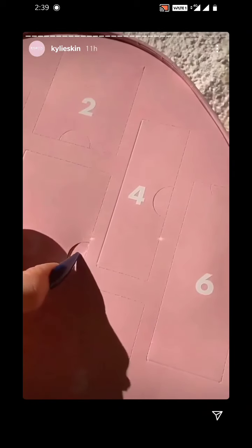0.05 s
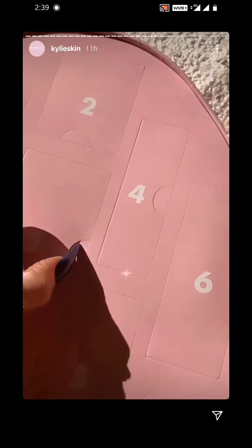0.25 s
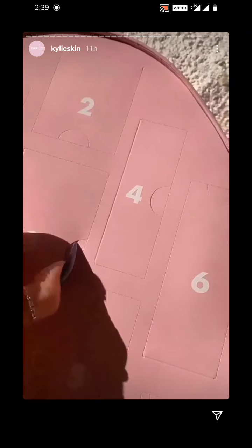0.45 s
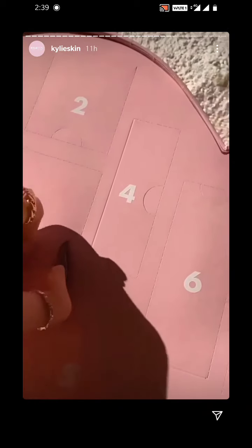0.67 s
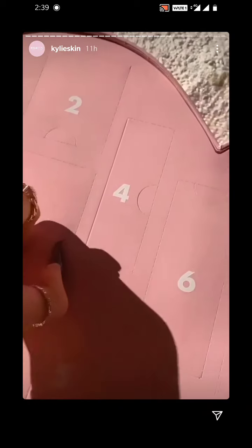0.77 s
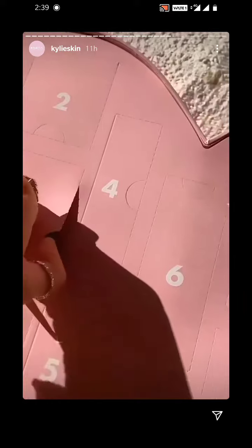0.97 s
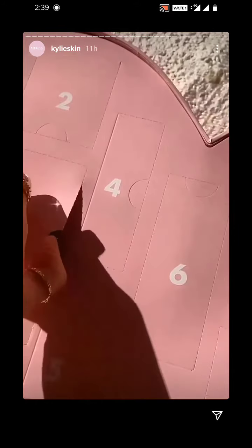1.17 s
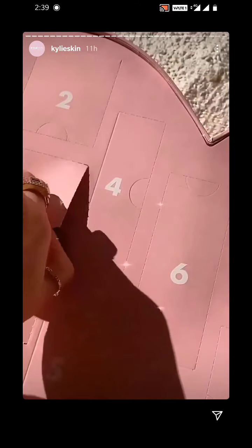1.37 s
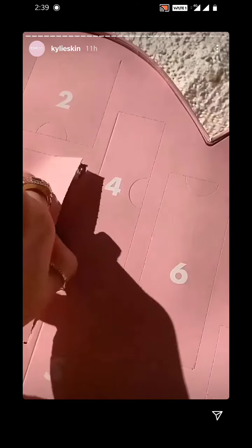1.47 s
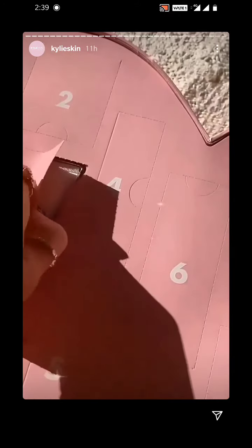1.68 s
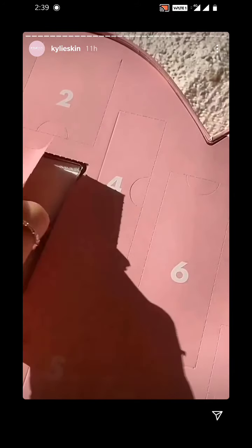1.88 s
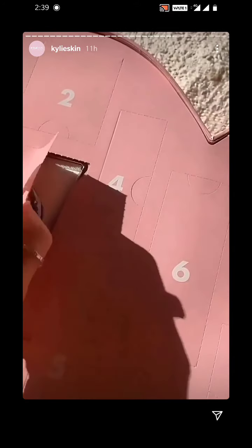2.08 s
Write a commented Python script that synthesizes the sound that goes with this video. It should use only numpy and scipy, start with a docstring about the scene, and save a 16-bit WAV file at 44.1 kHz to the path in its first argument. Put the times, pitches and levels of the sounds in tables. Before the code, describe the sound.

Perforated cardboard flap pried open by a fingernail: a few isolated dry ticks, a tight burst of snaps, then a dense crackling tear, a short fold creak and papery rubbing, close phone microphone in a quiet room.

```python
"""Paper bridges snap one by one, dry cracks with a card-like knock, as a fingernail pries open a perforated
cardboard door close to a phone; the flap rubs in its frame, its fold creaks, a quiet room hums and answers.
Snap: a fibre-noise burst rings the card; flap and hollow box ring as a bending wave, treble first, bass last.
Creak: trains of tiny snaps. Rub: grainy coloured noise. Room: noise tails on the snaps, air noise, mains hum.
"""
import sys
import numpy as np
from scipy import signal
from scipy.fft import rfft, irfft, next_fast_len
from scipy.io import wavfile
from scipy.ndimage import uniform_filter1d, map_coordinates

SR = 44100
rng = np.random.default_rng(int(sys.argv[2]) if len(sys.argv) > 2 else 0)


def wrap_up_sound(samples):
    """Save the sound to the file named by the first command line argument, as 16-bit audio."""
    columns = np.atleast_2d(samples).T
    # keep every value between -1 and 1, then stretch to whole-number steps
    tamed = np.clip(columns, -1, 1)
    steps = np.round(tamed * 32767).astype(np.int16)
    wavfile.write(sys.argv[1], SR, steps)


def elevation(decibels):
    """Turn decibel levels (scalar or array-like) into linear amplitude ratios."""
    levels = np.asarray(decibels, float)
    return 10 ** (levels / 20)


N = 94109


def along(points, hz):
    """Interpolate (f/Hz, value) points on a log frequency axis."""
    f, v = np.transpose(points)
    return np.interp(np.log(hz + 1), np.log(f + 1), v)


def unit(x):
    """Scale to rms 1."""
    return x / np.sqrt(np.mean(x ** 2) + 1e-20)


def wobble(knots_per_s):
    """Smooth random curve: a spline through normal knots."""
    knots = rng.standard_normal(N // 8)
    return map_coordinates(knots, [np.arange(N) * min(knots_per_s / SR, 0.1)])


def filtered(x, response):
    """Multiply the spectrum of x by a response of frequency in Hz."""
    m = next_fast_len(N + 8192)
    return irfft(rfft(x, m) * response(np.fft.rfftfreq(m, 1 / SR)), m)[:N]


def modes(f, table):
    """Causal sum of resonances (f/Hz, width/Hz, level/dB), alternating in sign."""
    total = 0
    for k, (centre, width, db) in enumerate(table):
        resonance = 1j * f * width / (centre * centre - f * f + 1j * f * width)
        total = total + (-1) ** k * elevation(db) * resonance
    return total


def peak(spectrum, db):
    """Waveform of a spectrum; a sine with the power of its loudest millisecond would peak at db."""
    x = irfft(spectrum)
    loudest_power = uniform_filter1d(x * x, size=SR // 1000).max()
    return elevation(db) * x / np.sqrt(2 * loudest_power)


def background():
    """Room air as coloured noise, mains hum as sines wavering in level and phase."""
    # air noise spectrum, relative: f/Hz, density/dB per Hz
    air_colour = [(15, -72), (25, -35), (44, -6), (123, -6.5), (157, -15), (335, -18.5), (363, -18.5),
                  (427, -25), (818, -31), (1190, -33.5), (1370, -26.5), (2110, -41.5), (16000, -61)]
    # mains hum partials: f/Hz, mean level/dB rms
    hum_partials = [(59.5, -78.5), (119.5, -65), (240, -80), (359, -88.5)]
    air_db_rms, hum_waver_db = -65, 0.5
    t = np.arange(N) / SR
    air = unit(filtered(rng.standard_normal(N), lambda hz: elevation(along(air_colour, hz))))
    hum = np.zeros(N)
    for hz, db in hum_partials:
        level = elevation(db + 3 + hum_waver_db * wobble(14))  # +3 dB: rms to sine peak
        hum += level * np.sin(2 * np.pi * hz * t + 0.45 * wobble(9))
    return elevation(air_db_rms) * air + hum


def room(x):
    """Diffuse reverberation: noise tails, each frequency dying at its own speed, a fresh tail every 0.1 s."""
    # reverberation time: f/Hz, t60/s
    decay_times = [(150, 0.38), (1200, 0.34), (5000, 0.37), (14000, 0.22)]
    out, step = np.zeros(N + SR), SR // 10
    for a in range(0, N, step):
        hz, t, z = signal.stft(rng.standard_normal(SR // 2), SR, nperseg=256)
        t60_s = np.maximum(along(decay_times, hz), 0.02)[:, None]
        tail = signal.istft(z * elevation(-60 * t / t60_s), SR, nperseg=256)[1]
        wet = signal.fftconvolve(x[a:a + step], tail / np.linalg.norm(tail))
        out[a + 150:][:len(wet)] += wet  # 150 samples of pre-delay
    return out[:N]


def rub():
    """Flap and fingers slide on the card: noise with a random grain, coloured, following a level curve."""
    # rubbing level: t/s, level/dB
    rub_level = [(0, -86), (.3, -84), (.4, -79.5), (.58, -79), (.66, -82), (.78, -72), (0.919, -77.5),
                 (1.0, -72), (1.07, -78.5), (1.17, -74), (1.25, -66), (1.33, -68), (1.46, -66.5),
                 (1.56, -71), (1.59, -65), (1.63, -65.5), (1.66, -74.5), (1.70, -66), (1.74, -79),
                 (1.87, -77.5), (1.946, -64), (1.986, -60.5), (2.008, -68), (2.042, -61), (2.081, -75),
                 (2.13, -70.5)]
    # rubbing spectrum, relative: f/Hz, density/dB per Hz
    rub_colour = [(180, -59), (300, 4.5), (701, -7.5), (856, -1), (1750, -13), (2170, -9), (2840, -12.5),
                  (3830, -13.5), (8090, -16.5), (16000, -36)]
    grain = elevation(3.5 * wobble(900) + 0.8 * wobble(60))  # fine and slow grain, dB
    noise = grain * rng.standard_normal(N)
    hiss = unit(filtered(noise, lambda hz: elevation(along(rub_colour, hz))))
    s, db = np.transpose(rub_level)
    return hiss * elevation(np.interp(np.arange(N) / SR, s, db))


def slips():
    """Stick-slip in the fold: rows of tiny snaps at an uneven rate, fading."""
    # creaks of the fold: start t/s, end t/s, mean rate/(slips per s), initial flap level/dB (before scatter)
    creaks = [(1.585, 1.654, 95, -54), (2.025, 2.055, 140, -58.5)]
    flap_hz, crack_re_flap_db, fade_db = 1200, -4.5, 5  # fade over one creak
    rows = []
    for start, end, rate, db in creaks:
        chance = rng.standard_normal((12, 3))
        for k, (late, tune, size) in enumerate(chance):
            s = start + (k + 0.12 * late * (k > 0)) / rate
            if s >= end:
                continue
            level_db = db - fade_db * (s - start) / (end - start) + 2 * size
            rows.append((s, flap_hz * (1 + 0.07 * tune), level_db, level_db + crack_re_flap_db, -90, 2))
    return rows


def tearing(ms, tear_ms):
    """Envelope of breaking fibres: creak and build-up before the break at 0 ms, decay and fraying after."""
    creak_ms, creak_db = 2.2, -18  # fibres giving way before the snap
    fray_ms, fray_db = 7, -19  # loose fibres crackling on
    rise_ms = max(0.31 * tear_ms, 0.05)
    away = np.abs(ms)
    before = elevation(creak_db) * np.exp(-away / creak_ms) + np.exp(-away / rise_ms)
    after = np.exp(-away / max(tear_ms, 0.1)) + elevation(fray_db) * np.exp(-away / fray_ms)
    return np.where(ms < 0, before, after)


def snaps():
    """Fibre bursts ring the card; flap and box ring through dispersive bending waves, treble first."""
    # paper bridges and nail ticks: t/s, flap f/Hz, flap peak level/dB, crack peak level/dB,
    # box boom peak level/dB, tearing decay/ms
    bridges = [(0.0475, 1403, -37, -52.5, -58.5, 0.94), (0.3365, 1770, -56, -60.5, -72, 0.6),
               (0.3543, 1180, -63, -71, -63.5, 1.6), (0.5072, 1065, -40.5, -47.5, -43.5, 2.2),
               (0.6934, 1996, -28, -28, -45.5, 0.44), (0.702, 1780, -48, -41.5, -51, 14.4),
               (0.7056, 1115, -27.5, -35.5, -51, 2.1), (0.7261, 2370, -33.5, -30, -46.5, 1.6),
               (0.8025, 1290, -49.5, -44, -53.5, 2), (1.0127, 1160, -63, -61, -60, 1.2),
               (1.101, 1166, -44, -53.5, -56, 5.1), (1.1759, 1180, -58, -63.5, -63.5, 2.2),
               (1.1857, 1130, -62, -59, -67, 1.9), (1.21, 1240, -60, -56.5, -76, 3.5),
               (1.2204, 1140, -49.5, -59, -74, 3.1), (1.229, 1200, -43.5, -45.5, -79, 4.2),
               (1.2676, 2500, -43, -33.5, -71, 0.3), (1.2772, 1100, -37.5, -28, -51.5, 1.55),
               (1.2917, 2440, -64, -62, -43, 0.35), (1.292, 2390, -31, -25.5, -79, 2.4),
               (1.2984, 1530, -24.5, -28.5, -45.5, 5.3), (1.3083, 1540, -49, -35, -53, 1.5),
               (1.3836, 1285, -44, -38, -43, 1.8), (1.3877, 1100, -26.5, -26, -45.5, 3.4),
               (1.4039, 1360, -20, -25, -47, 0.68), (1.42, 744, -30, -37.5, -43.5, 1.6),
               (1.4391, 2046, -24.5, -27.5, -32, 3.4), (1.6715, 988, -26.5, -39.5, -42, 3.7),
               (1.71, 1040, -59, -50, -73, 4.8), (1.821, 1050, -54.5, -61.5, -61.5, 1.4),
               (1.8444, 1350, -66, -62.5, -81, 1.2), (1.9125, 867, -46.5, -65, -58.5, 1.4),
               (1.968, 2070, -44, -44.5, -46, 4.9), (2.017, 2290, -56, -51, -60, 7)]
    # card resonances, f and level scattered per snap: f/Hz, width/Hz (at least 600 used), relative level/dB
    card_modes = [(2043, 440, -1), (3470, 1090, -0.5), (4385, 1090, 0.5), (6660, 470, -6.5),
                  (7910, 685, -4.5), (14600, 20000, -32.5)]
    # panel round the flap, f and level scattered per snap: f/Hz, width/Hz, level/dB
    panel_modes = [(907, 220, -5), (1240, 233, -1)]
    # hollow box resonances, each squared below: f/Hz, width/Hz, level/dB before squaring
    box_modes = [(168, 62, 7.5), (348, 171.6, 5), (780, 120, -10)]
    # dip in the crack's spectrum, made by subtracting a resonance: f/Hz, width/Hz, level/dB
    crack_dip = (2850, 700, -2)
    flap_spread_ms, box_spread_ms = 2.061, 3.417  # travel time at 1 kHz, as 1 / sqrt(f); box is farther
    head_start_ms = 1.332  # taken off the wave delay of flap and boom, offsets the delay of their resonances
    edge_ms, edge_db = 5.02, -15.5  # flap wave returning from the edge of the card
    flap_damping = 0.31  # ring width / pitch
    panel_reach_hz = 1400  # the flap drives panel modes near its own pitch
    kick = 0.5  # single break re all the fibre noise, amplitude ratio

    size, lead = 8192, 1024
    out = np.zeros(N + size)
    ms = (np.arange(size) - lead) / SR * 1000
    f = np.fft.rfftfreq(size, 1 / SR)

    def travel(spread_ms):
        """Bending-wave phase: group delay spread_ms / sqrt(kHz), less the head start."""
        dispersion = -4j * np.pi * spread_ms * np.sqrt(f / 1000)
        return np.exp(dispersion + 2j * np.pi * f * (head_start_ms / 1000 - lead / SR))

    dip = 1 - modes(f, [crack_dip])
    edge = 1 + elevation(edge_db) * np.exp(-2j * np.pi * f * edge_ms / 1000)
    box = sum(modes(f, [wall]) ** 2 for wall in box_modes)
    boom = box * travel(box_spread_ms) / (1 + (f / 800) ** 4)

    for s, hz, flap_db, crack_db, boom_db, tear_ms in bridges + slips():
        burst = tearing(ms, tear_ms)
        break_pulse = kick * np.sqrt(np.sum(burst ** 2)) * (ms == 0)
        fibres = rng.standard_normal(size) * burst + break_pulse
        card = [(c * (1 + 0.04 * rng.normal()), max(w, 600), db + 1.5 * rng.normal())
                for c, w, db in card_modes]
        crack = rfft(fibres) * modes(f, card) * dip

        panel = [(c * (1 + 0.03 * rng.normal()), w, db + rng.normal(0, 2)) for c, w, db in panel_modes]
        flap_ring = modes(f, [(hz, flap_damping * hz, 0)]) ** 2
        panel_ring = modes(f, panel) * modes(f, [(hz, panel_reach_hz, 0)])
        flap = (flap_ring + panel_ring) * edge * travel(flap_spread_ms)

        snap = peak(crack, crack_db) + peak(flap, flap_db) + peak(boom, boom_db)
        out[round(s * SR) - lead:][:size] += snap
    return out[:N]


def scene():
    """Snaps and creaks, the room's answer to them, rubbing, background."""
    card = snaps()
    room_db = -18.5
    return (card + elevation(room_db) * room(card) + rub() + background())[None]


def top_cut(x):
    """Nothing passes above the cut-off."""
    return signal.sosfilt(signal.butter(12, 16480, fs=SR, output="sos"), x)


def record(dry):
    """The phone's band limit: steep zero-phase low-pass, -3 dB at top_hz."""
    top_hz = 15600
    limited = filtered(dry[0], lambda hz: 1 / np.sqrt(1 + (hz / top_hz) ** 60))
    return top_cut(limited[None])


dry = scene()
out = record(dry)
wrap_up_sound(out)
```